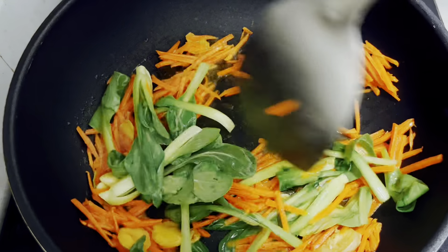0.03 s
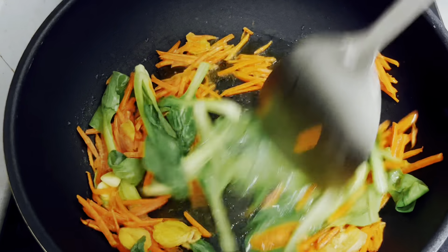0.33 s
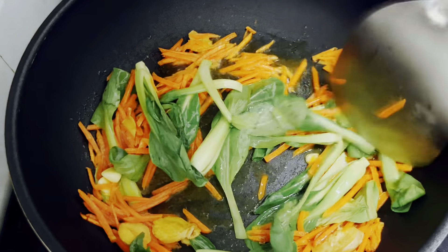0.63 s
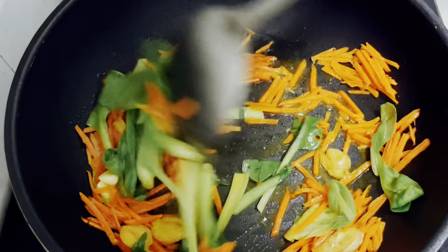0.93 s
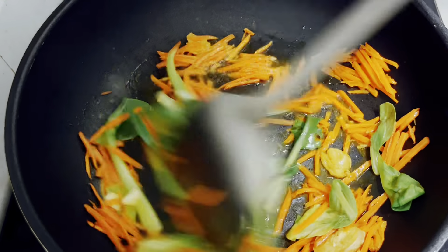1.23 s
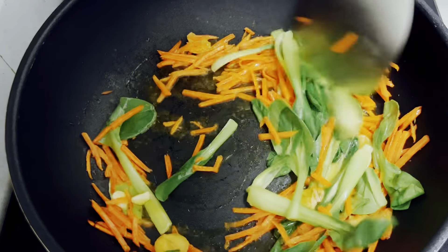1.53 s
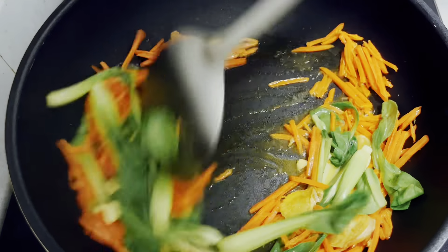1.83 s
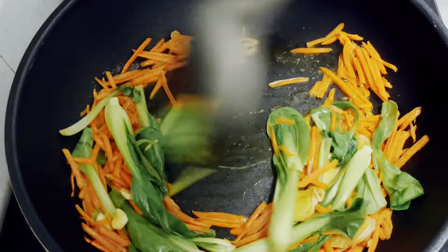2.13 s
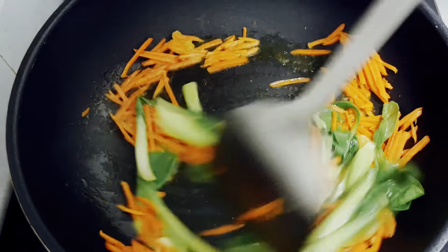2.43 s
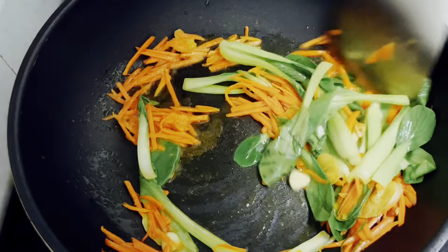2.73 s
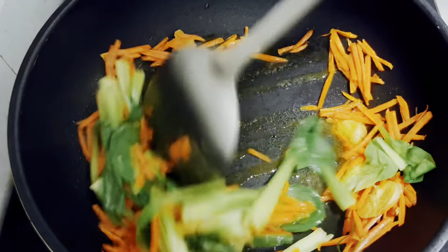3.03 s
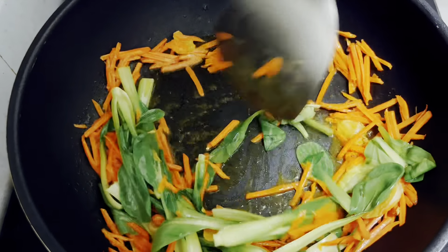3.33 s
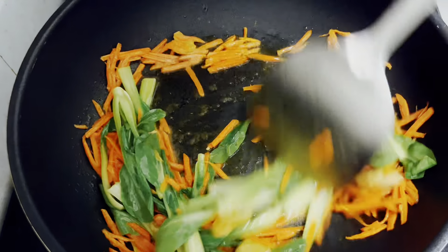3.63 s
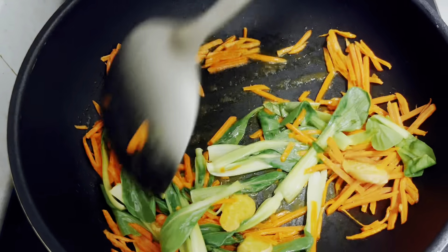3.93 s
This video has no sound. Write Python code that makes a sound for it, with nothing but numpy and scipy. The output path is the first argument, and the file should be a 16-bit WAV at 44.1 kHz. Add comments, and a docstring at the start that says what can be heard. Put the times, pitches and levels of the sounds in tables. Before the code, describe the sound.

Vegetables sizzle steadily in a hot wok as a spatula knocks and scrapes.

```python
"""A steady sizzle with louder spits: vegetables fry in a hot wok, close to a pair of microphones.
Tiny bursts of steam in the oil make the sizzle; the hob hums underneath. A spatula turns the food,
which drops back with soft thuds; the blade ticks, knocks and scrapes on the pan and clangs once."""
import sys
import numpy as np
from scipy import signal
from scipy.fft import rfft, irfft
from scipy.io import wavfile

SR = 44100
rng = np.random.default_rng(int(sys.argv[2]) if len(sys.argv) > 2 else 0)


def int16_out(signal):
    """Quantize to a 16-bit WAV file."""
    q = np.round(np.clip(np.atleast_2d(signal).T, -1, 1) * 32767)
    wavfile.write(sys.argv[1], SR, q.astype(np.int16))


N = 176400
T = np.arange(N) / SR
HZ = np.maximum(np.fft.rfftfreq(N, 1 / SR), 1)

# sizzle envelope: t/s, low and middle level/dB, treble level/dB
SIZZLE_LEVELS = [(0, -26.5, -29), (.14, -27.5, -30.5), (.39, -27, -28), (0.668, -29.5, -31),
                 (.71, -25, -33.5), (.77, -28.5, -31.5), (1.05, -28.5, -31.5), (1.36, -26.5, -29.5),
                 (1.46, -29.5, -34), (1.94, -26.5, -31.5), (2.07, -28.5, -34.5), (2.42, -27.5, -31),
                 (2.67, -30.5, -34.5), (3.13, -30.5, -30.5), (3.58, -32, -34.5), (3.66, -33, -39.5),
                 (3.87, -32, -35)]
# sizzle spectrum: f/Hz, relative density/dB
SIZZLE_SPECTRUM = [(200, -18.5), (800, -10.5), (1200, -4), (1600, -6.5), (2100, -3.5), (3000, -1),
                   (5000, -0.5), (6500, 0), (8500, 2.5), (15000, 0)]
# kitchen rumble: f/Hz, relative density/dB
RUMBLE_SPECTRUM = [(20, -27), (50, -4), (100, -3.5), (150, -7), (300, -10.5), (3000, -93)]
# oil spits: t/s, peak/dB, centre/Hz
OIL_SPITS = [(0.0917, -8.5, 3650), (0.3707, -9.5, 3830), (0.5154, -6.5, 10300), (.6419, -7, 11200),
             (1.1034, -7, 5180), (1.3555, -9, 3400), (1.3885, -7, 4960), (1.7736, -7, 9000),
             (1.9612, -5, 5000), (2.036, -7, 6200), (2.115, -14, 2300), (2.309, -13, 2400),
             (2.553, -11, 4660), (2.602, -4.5, 8500), (3.229, -8.5, 6000)]
# wok modes: f/Hz, relative level/dB, t60/s
WOK_MODES = [(52, 9, 0.36), (115.4, 5.5, 0.96), (210.7, 4.5, 0.59), (277, -6.5, 0.25), (329, -4, 0.41),
             (407.7, -11.5, 1), (497.7, 4.5, 0.27), (522, 5, 0.097), (722, -1, 0.12), (735, 1, 0.1),
             (860, -23, 0.23), (1072, -6.5, 0.34), (1232, 0.5, 0.48), (1396, -2.5, 0.22), (2740, -4, 0.26)]
# falling food: t/s, length/s, rms/dB, centre/Hz
FOOD_THUDS = [(0.295, 0.07, -34, 110), (0.708, 0.11, -36, 140), (1.62, 0.12, -38.5, 120),
              (2.365, 0.08, -39.5, 85), (2.765, 0.16, -39, 125), (3.18, 0.1, -42, 80),
              (3.612, 0.06, -35.5, 80)]
# spatula edge taps: t/s, peak/dB, centre/Hz, width/oct
EDGE_TICKS = [(0.6805, -3, 3200, 0.55), (0.6917, -2, 3000, 3.2), (1.8068, -3.5, 1900, 2.3),
              (1.9788, -3.5, 2700, 1.96), (3.6053, -3, 1480, 0.65), (3.6058, -8, 5830, 0.94),
              (3.8493, -9, 3800, 0.49)]
# knocks on the wok: t/s, peak/dB, centre/Hz, width/oct, share of free ring time
WOK_KNOCKS = [(0.692, -15.5, 1350, 0.9, 0.87), (0.703, -18, 217, 0.93, 0.79), (1.806, -23, 1200, 3.4, 0.32),
              (1.978, -27.5, 880, 1.9, 0.31), (3.606, -12.5, 890, 1.5, 0.61), (3.615, -10, 241, 1.23, 0.43),
              (3.657, -22, 338, 1.6, 1.1)]
# steel blade modes: f/Hz, relative level/dB, t60/s
BLADE_MODES = [(1028, -27, .14), (1225, -9, .085), (3117, -19, .1), (4340, -25, .14)]
# spatula slides: start/s, peak/s, end/s, rms/dB, centre/Hz, width/oct
SPATULA_SCRAPES = [(.695, .712, .73, -26, 1150, .6), (1.295, 1.305, 1.4, -39, 1500, 3),
                   (2.402, 2.505, 2.535, -27, 630, .7), (2.405, 2.47, 2.53, -31.5, 2000, 2.4),
                   (2.44, 2.475, 2.5, -31, 3280, .2), (3.613, 3.62, 3.67, -24.5, 800, 1.6)]
# left-right likeness: f/Hz, coherence
MIC_COHERENCE = [(100, 0.98), (800, 0.84), (1400, 0.033), (2000, 0.94), (3500, 0.34), (7300, 1), (8000, 1),
                 (15000, 0.98)]
# left lead over right: f/Hz, phase/rad
MIC_PHASE = [(100, 0), (2000, -.2), (3000, -1), (3800, -.3), (4800, -.3), (5600, .8), (7400, 2),
             (7900, 3.14), (9100, 3.16), (10200, 6.28), (13600, 6.3), (14700, 9.42)]
# left minus right: f/Hz, level/dB
MIC_BALANCE = [(40, -1), (130, 4), (500, 5), (1500, 0), (3000, 3.5), (5000, 4.5), (8000, -0.5)]

BURSTS_PER_S, BURST_SPREAD_DB, BURST_MAX_DB, HISS_GAIN = 5000, 2, 8.8, .29
FLICKER_DB, FLICKER_HZ, SURGE_DB, SURGE_HZ = 1.85, 174, .7, 24
MIDDLE_GAIN_DB, TREBLE_GAIN_DB, MIDDLE_FROM_HZ, TREBLE_FROM_HZ = 5.5, 7, 3100, 4630
HUM_HZ, HUM_DB, HUM_WAVER_DB, HUM_WAVER_HZ, RUMBLE_DB = 100.2, -44.5, .9, 1.7, -52
CLATTER_DB, CLATTER_T60_S = 15.5, .34
SLIPS_PER_S, PRESSED_RING_SHARE = 900, .22


def from_db(db):
    """Decibels to gain."""
    return 10 ** (np.asarray(db) / 20)


def unit_rms(x):
    """Scale to rms 1."""
    return x / np.sqrt(np.mean(x ** 2) + 1e-20)


def per_hz(points):
    """Interpolate a table over log frequency."""
    hz, value = np.transpose(points)
    return np.interp(np.log(HZ), np.log(hz), value)


def drift(corner_hz):
    """Low-passed noise, rms 1."""
    return unit_rms(irfft(rfft(rng.standard_normal(N)) / (1 + (HZ / corner_hz) ** 2), N))


def band(x, hz, octaves):
    """Gentle causal band-pass."""
    edges_hz = np.clip([hz / 2 ** (octaves / 2), hz * 2 ** (octaves / 2)], 15, .47 * SR)
    return signal.sosfilt(signal.butter(2, edges_hz, "band", fs=SR, output="sos"), x + 1e-18)


def coloured(x, spectrum):
    """Apply a spectrum; rms 1."""
    return unit_rms(irfft(rfft(x) * from_db(per_hz(spectrum)), N))


def add(out, start_s, sound):
    """Mix a sound in at its time."""
    i = int(start_s * SR)
    out[..., i:i + sound.shape[-1]] += sound[..., :N - i]


def steam_bursts():
    """Steam bursts of uneven size, scattered around the pan, over a fine hiss; the level flickers."""
    born = rng.random(N) < BURSTS_PER_S / SR
    sizes = born * from_db(np.minimum(rng.exponential(BURST_SPREAD_DB, N), BURST_MAX_DB))
    angle_rad = rng.uniform(0, 2 * np.pi, N)
    bursts = unit_rms(sizes * np.array([np.cos(angle_rad), np.sin(angle_rad)]))
    hiss = HISS_GAIN * rng.standard_normal((2, N))
    return (bursts + hiss) * from_db(FLICKER_DB * drift(FLICKER_HZ))


def sizzle(shared_gain=.54):
    """Steam in the oil: three bands, each with its own bursts plus a set common to all."""
    times_s, middle_db, treble_db = np.transpose(SIZZLE_LEVELS)
    middle = from_db(MIDDLE_GAIN_DB + np.interp(T, times_s, middle_db))
    treble = from_db(TREBLE_GAIN_DB + np.interp(T, times_s, treble_db))
    below_middle, below_treble = (1 / (1 + (HZ / hz) ** 6) for hz in (MIDDLE_FROM_HZ, TREBLE_FROM_HZ))
    zones = (below_middle, np.abs(below_treble - below_middle), 1 - below_treble)
    shared = shared_gain * steam_bursts()
    out = np.zeros((2, N))
    for zone, gain in zip(zones, (middle, middle, treble)):
        bursts = coloured(shared + steam_bursts(), SIZZLE_SPECTRUM)
        out += gain * irfft(rfft(bursts) * np.sqrt(zone), N)
    return out * from_db(SURGE_DB * drift(SURGE_HZ))


def hob():
    """Wavering mains hum over a low rumble."""
    out = from_db(RUMBLE_DB) * coloured(rng.standard_normal((2, N)), RUMBLE_SPECTRUM)
    hum_rms = from_db(HUM_DB + HUM_WAVER_DB * drift(HUM_WAVER_HZ))
    out[0] += hum_rms * np.sqrt(2) * np.sin(2 * np.pi * HUM_HZ * T)
    return out


def snap(hz, octaves, tail_s, tail_db):
    """A click and its short scatter inside the pan; peak 1."""
    t = T[:SR // 20]
    click = from_db(tail_db) * rng.standard_normal((2, len(t))) * np.exp(-t / tail_s)
    click[0, 0] += 1
    click = band(click, hz, octaves)
    return click / np.abs(click).max()


def spits(out):
    """Drops burst in the oil."""
    for start_s, db, hz in OIL_SPITS:
        add(out, start_s, from_db(db) * snap(hz, octaves=1.45, tail_s=.001, tail_db=0))


def wok_ring(ring_share):
    """Wok impulse response: modes plus dense clatter, both shortened by damping."""
    t = T[:SR * 2 // 3]
    hz, db, t60_s = np.transpose(WOK_MODES)[:, :, None]
    envelopes = from_db(db + rng.standard_normal(hz.shape) - 60 * t / (t60_s * ring_share))
    modes = envelopes * np.sin(2 * np.pi * hz * t)
    signs = np.array([(-1) ** np.arange(len(hz)), rng.choice([-1, 1], len(hz))])
    clatter_gain = from_db(CLATTER_DB - 60 * t / (CLATTER_T60_S * ring_share))
    return signs @ modes + clatter_gain * rng.standard_normal((2, len(t)))


def rub(rise_s, length_s, hz, octaves, start_force=0):
    """Small slips swell, fade and shake the damped wok; mid energy equals rms 1 over length_s."""
    t = T[:SR // 4]
    slips = (rng.random(len(t)) < SLIPS_PER_S / SR) * rng.standard_normal(len(t))
    force = slips * np.interp(t, [0, rise_s, length_s], [start_force, 1, 0])
    shake = signal.fftconvolve(force[None], wok_ring(PRESSED_RING_SHARE), axes=1)
    shake = band(shake, hz, octaves)
    return shake / np.sqrt(np.sum(shake[0] ** 2) / (length_s * SR) + 1e-20)


def thuds(out, rise_share=.39):
    """Food drops back, shaking and damping the wok."""
    for start_s, length_s, db, hz in FOOD_THUDS:
        add(out, start_s, from_db(db) * rub(rise_share * length_s, length_s, hz, octaves=1.87))


def ticks(out):
    """The spatula's edge taps the pan."""
    for start_s, db, hz, octaves in EDGE_TICKS:
        add(out, start_s, from_db(db) * snap(hz, octaves, tail_s=.002, tail_db=-11))


def knocks(out):
    """Spatula blows ring the wok."""
    for start_s, db, hz, octaves, ring_share in WOK_KNOCKS:
        ring = band(wok_ring(ring_share), hz, octaves)
        add(out, start_s, from_db(db) * ring / np.abs(ring[0]).max())


def blade_clang(out, start_s=.692, swell_s=.012):
    """The blade skids on the pan: a few clear partials swell and ring out."""
    t = T[:SR // 2]
    hz, db, t60_s = np.transpose(BLADE_MODES)[:, :, None]
    partials = from_db(db - 60 * t / t60_s) * np.sin(2 * np.pi * hz * t)
    swell = 1 - np.exp(-t / swell_s)
    add(out[0], start_s, 2 * swell * partials.sum(axis=0))


def scrapes(out):
    """The spatula bites and slides, shaking and damping the wok."""
    for start_s, peak_s, end_s, db, hz, octaves in SPATULA_SCRAPES:
        slide = rub(peak_s - start_s, end_s - start_s, hz, octaves, start_force=.23)
        add(out, start_s, from_db(db) * slide)


def microphones(mid, side):
    """Mid/side to left/right: two spaced ports differ in phase and level at each frequency."""
    coherence = np.clip(per_hz(MIC_COHERENCE), 0, .995)
    sign = np.array([[1], [-1]])
    pair = np.sqrt((1 + coherence) / 2) * rfft(mid) + sign * np.sqrt((1 - coherence) / 2) * rfft(side)
    pair[1] *= np.exp(-1j * per_hz(MIC_PHASE))
    return irfft(pair * from_db(sign * per_hz(MIC_BALANCE) / 2), N)


def scene():
    """All sources mix as mid/side and reach the same two microphones."""
    mid_side = sizzle() + hob()
    for source in (spits, thuds, ticks, knocks, blade_clang, scrapes):
        source(mid_side)
    return microphones(*mid_side)


def record(dry):
    """Clip at full scale, then cut the top."""
    cutoff_hz, transition_hz = 15800, 150
    low_pass = np.clip((cutoff_hz - HZ) / transition_hz + .5, 0, 1)
    return irfft(rfft(np.clip(dry, -1, 1)) * low_pass, N)


dry = scene()
out = record(dry)
int16_out(out)
```